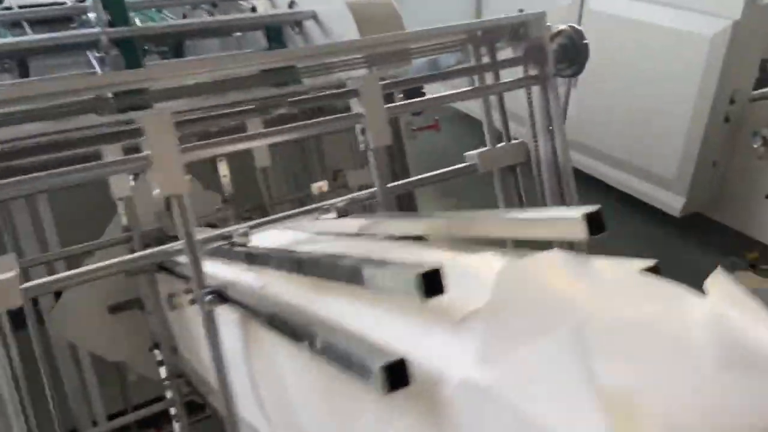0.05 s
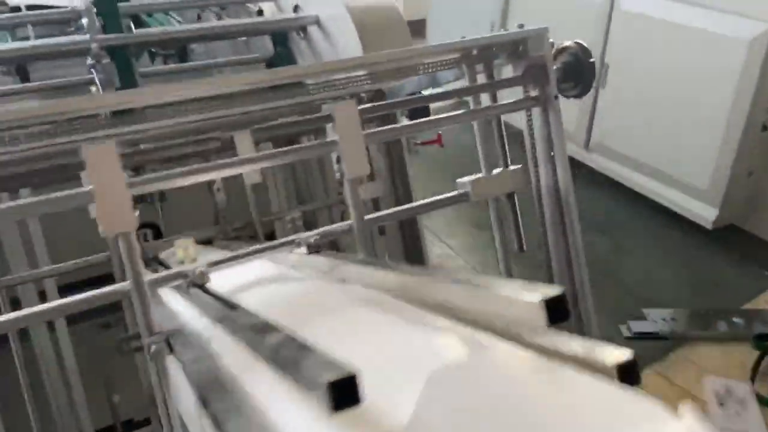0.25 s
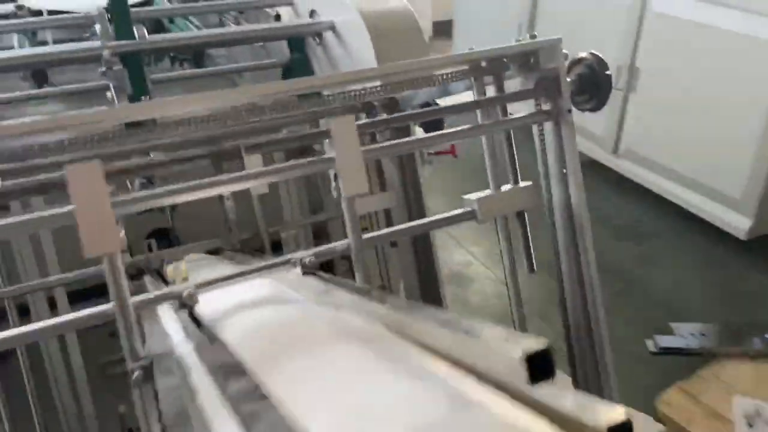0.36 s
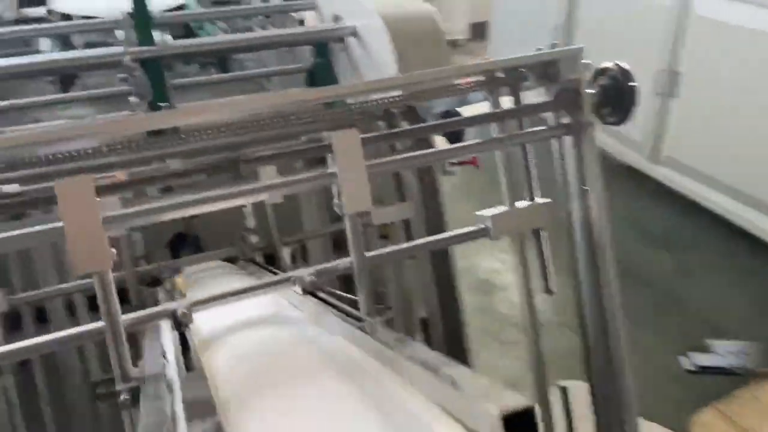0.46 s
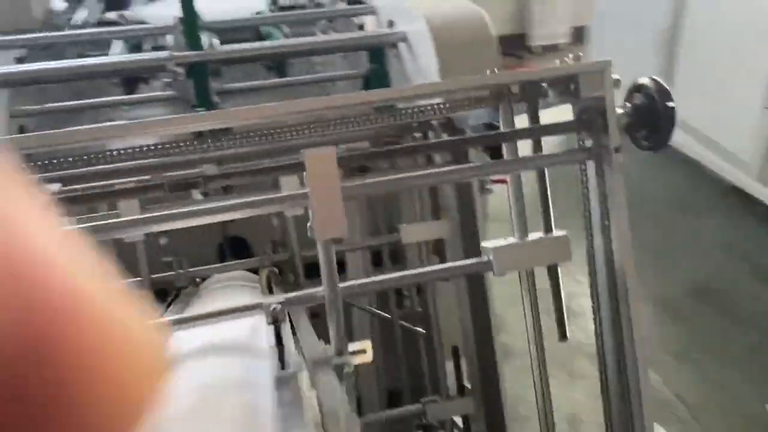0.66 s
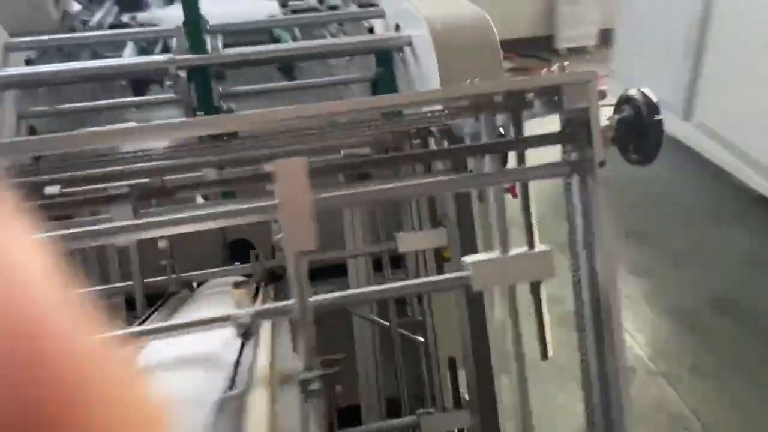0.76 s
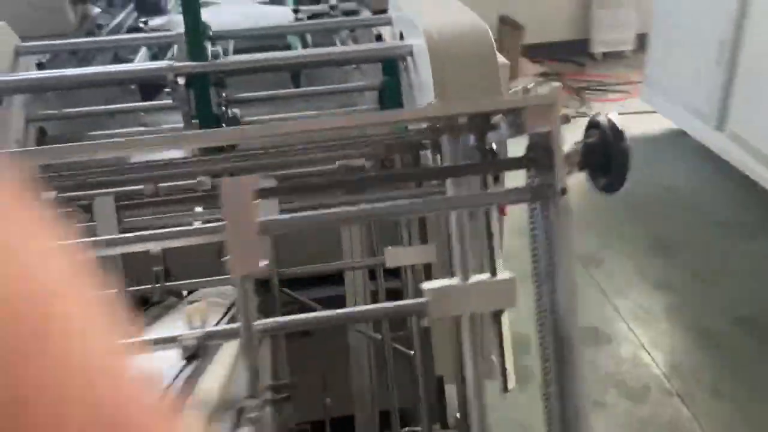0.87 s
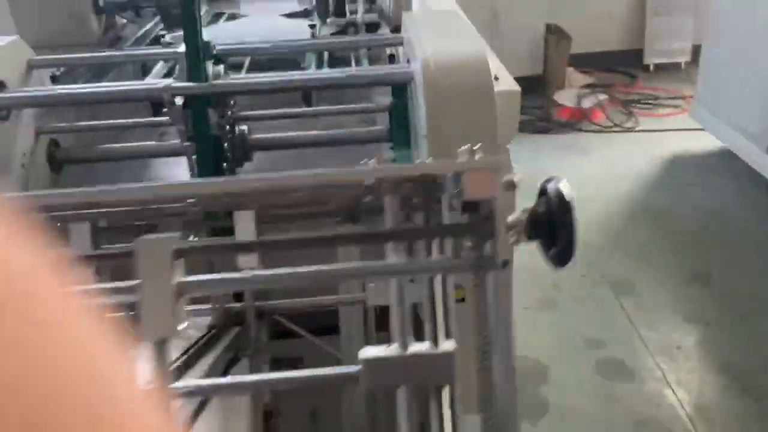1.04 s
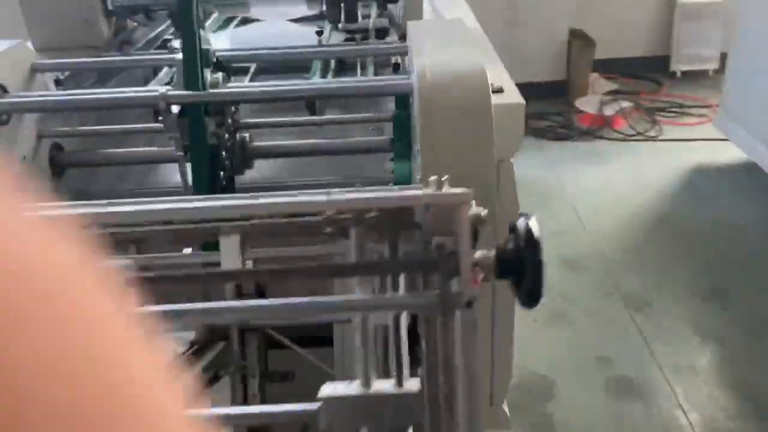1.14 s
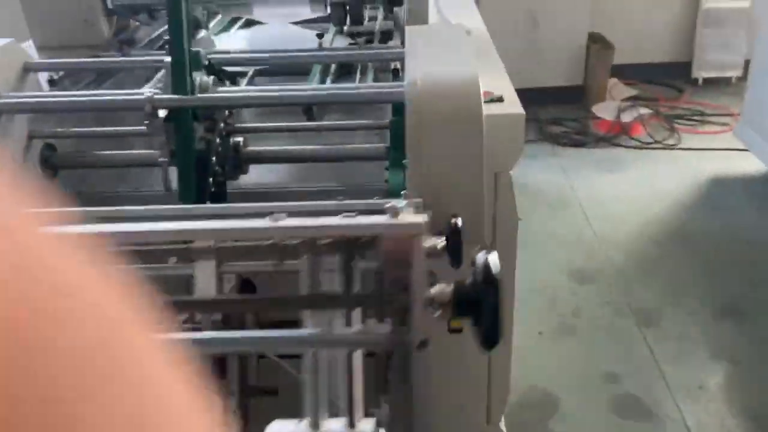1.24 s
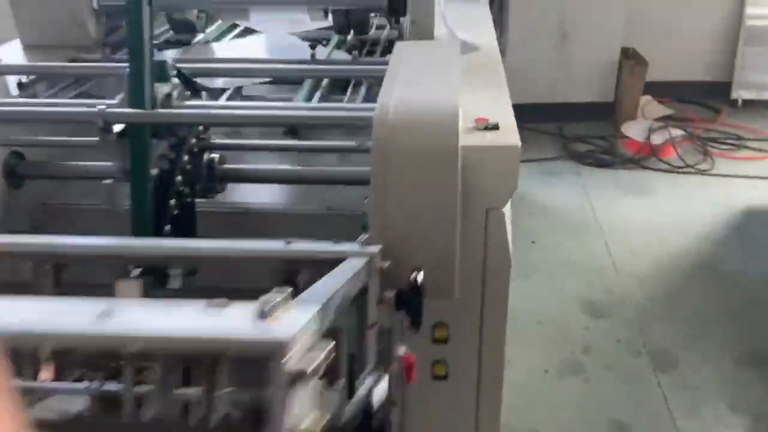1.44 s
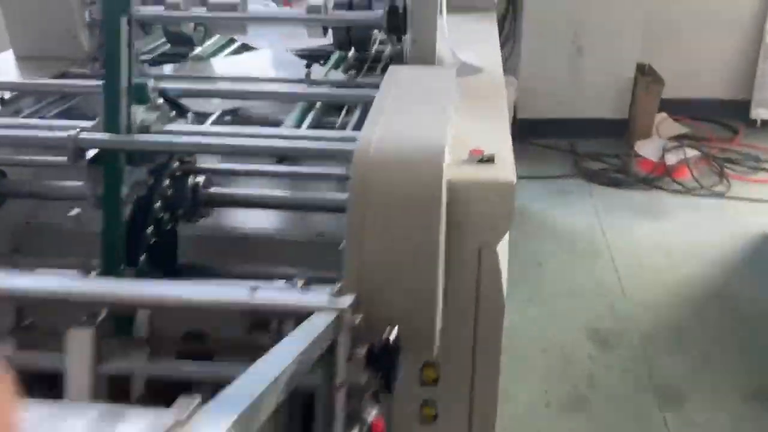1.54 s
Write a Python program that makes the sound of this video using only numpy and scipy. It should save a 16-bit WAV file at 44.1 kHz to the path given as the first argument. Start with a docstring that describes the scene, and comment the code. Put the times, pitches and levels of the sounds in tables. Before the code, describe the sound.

Steel bars clatter briefly, then knock lightly over a humming, whirring workshop machine.

```python
"""A clatter of steel guide bars comes first, then a few lighter knocks: a paper-box machine at work.
The stereo microphone is close beside the bars, in a hard-walled workshop. Each knock clicks, clanks the
loose clamps and sets bars and frame ringing, and the hall answers. Underneath, the mechanism thumps,
the drive hums, whines and rumbles, rollers whirr, small parts tick and an airy hiss comes and goes."""
import sys
import numpy as np
from scipy import signal
from scipy.fft import rfft, irfft
from scipy.io import wavfile
from scipy.ndimage import uniform_filter1d

SR = 44100
rng = np.random.default_rng(int(sys.argv[2]) if len(sys.argv) > 2 else 0)


def dump_mix(stems):
    """Bounce the given channels to the path in sys.argv[1] as a 16-bit WAV at rate SR."""
    frames = np.atleast_2d(stems).T  # one column per channel
    limited = np.clip(frames, -1, 1)  # hard clip at full scale
    pcm = np.round(limited * 32767).astype(np.int16)
    wavfile.write(sys.argv[1], SR, pcm)


N = 70560
TIME = np.arange(N) / SR
SIDES = np.array([[0.5], [-0.5]])  # splits a left-minus-right difference between the channels

# knocks beside the microphone: t/s, relative level/dB of body, of clank and of click, build-up/s
KNOCKS = [(0.076, -20, -16, -48, 0.0048), (0.088, -10.5, -12, -45, 0.0024), (0.097, -5, -10.5, -25, 0.0037),
          (0.1092, -3.5, -0.5, -16, 0.0028), (0.115, -1, -3.5, -19, 0.0041),
          (0.122, -13, -2.5, -22, 0.0041), (0.133, -6.5, -4, -18, 0.0043), (0.1414, -12, 0, -7, 0.006),
          (0.148, -11.5, -1.5, -13, 0.0033), (0.167, -12, -2.5, -23, 0.0029),
          (0.21, -19.5, -15, -40, 0.0027), (0.278, -46, -14, -43, 0.001), (0.2896, -45, -20.5, -14, 0.0018),
          (0.307, -14.5, -11, -30, 0.0048), (0.39, -20, -13, -28, 0.0046), (0.398, -13, -9, -27, 0.0052),
          (0.453, -25, -21, -52, 0.0067), (0.8088, -37, -15.5, -27.5, 0.00084)]
# colours of the bars' dense ring, their loose clamps and steel on steel: f/Hz, relative level/dB
BODY_COLOUR = [(40, -5), (120, -5), (200, -2), (300, -3.5), (400, -6), (490, -3), (760, -2.5), (1350, -0.5),
               (2000, -34), (3000, -20), (5000, -36), (15000, -64)]
CLANK_COLOUR = [(400, -15.5), (1200, 5.5), (1900, 2.5), (3000, -2), (4200, -11), (7000, -13.5),
                (15000, -68)]
CLICK_COLOUR = [(500, -30), (2500, -14), (4500, 3.5), (6500, -5), (10500, 5.5), (15500, -2.5)]
def guide_bars():
    """Each knock clicks steel on steel, clanks the clamps and sets off the bars' dense, short ring."""
    body_t60_s, clank_t60_s, click_t60_s = 0.1, 0.059, 0.018
    clank_left_db, click_lag_s = 3, 0.00028
    body = amp(-14) * noise(BODY_COLOUR)
    clank = amp(-14.5 + SIDES * clank_left_db) * noise(CLANK_COLOUR)
    snap = amp(-9) * noise(CLICK_COLOUR)[0]
    click = np.array([np.roll(snap, int(click_lag_s * SR)), snap])  # reaches the right port first
    out = np.zeros((2, N))
    for start, body_db, clank_db, click_db, build in KNOCKS:
        shift = rng.integers(N)  # a different stretch of noise for every knock
        parts = (body, body_db, body_t60_s), (clank, clank_db, clank_t60_s), (click, click_db, click_t60_s)
        for sound, db, t60 in parts:
            out += amp(db) * np.roll(sound, shift, axis=1) * strike(start, build, t60)
    return out


# notes of the square tubes, heard close: t/s, f/Hz, level/dB
TUBE_NOTES = [(0.1137, 784, -10), (0.136, 673, -11), (0.305, 655.4, -28), (0.395, 567, -29.5)]
def hollow_tubes():
    """The heavier knocks briefly sound the hollow of the tubes."""
    return sum(ring(start, hz, db, build=0.007, t60=0.03) for start, hz, db in TUBE_NOTES)


# modes of the steel frame: f/Hz, relative level/dB, left minus right level/dB, left phase lead/rad
FRAME_MODES = [(236, -2, 0, .2), (288, -1, 0, .2), (329, 0, 0, .3), (398, -5, 0, .4), (598, -6, 1, .6),
               (673, -1, 3, .8), (725, -2, 3, .8), (757, -1, 3, .8), (825, -3, 1, .9), (889, -2, -1, 1.),
               (1057, -6, -2, 1.2), (1126, -5, -3, 1.3), (1224, -4, -3, 1.4), (1343, -2, -3, 1.5),
               (1471, -4, -1, 1.5), (1840, -7, 2, 1.8)]
def frame():
    """The frame's modes store the energy of every knock and let it die away."""
    energy = sum((amp(db) * strike(start, build, t60=0.14)) ** 2 for start, db, _, _, build in KNOCKS)
    modes = 0
    for hz, db, left_db, lead in FRAME_MODES:
        phase = 2 * np.pi * (hz * TIME + rng.random()) + 0.58 * wander(41.1)
        tilt_db = -0.46 * np.log2(hz / 700)
        modes += amp(db + tilt_db + SIDES * left_db) * np.sin(phase + SIDES * lead)
    return amp(-19) * np.sqrt(energy) * modes


# colour of the workshop's echo at the microphone: f/Hz, relative level/dB
HALL_COLOUR = [(80, -18), (330, 1), (700, 0.5), (1500, 3.5), (2500, 2.5), (5000, 1), (15000, 2)]
def hall(sound):
    """The hard walls return a diffuse tail whose treble dies sooner."""
    wash = noise(HALL_COLOUR)
    low = signal.sosfilt(signal.butter(2, 3000, fs=SR, output="sos"), wash)
    treble = wash - low
    tail = low * strike(0, build=0.003, t60=1.68) + treble * strike(0, build=0.003, t60=1)
    return amp(-6) * through(sound.mean(axis=0), unit(tail) / np.sqrt(N))


# dull thumps from inside the machine: t/s, f/Hz, level/dB
THUMPS = [(0.175, 125.1, -25), (0.551, 125, -24), (0.628, 77.4, -25), (0.965, 150.2, -25),
          (0.971, 80.3, -23.5), (1.254, 75.7, -27.5)]
def thumps():
    """Each soft bump of the mechanism rings one low resonance."""
    return sum(ring(start, hz, db, build=0.0073, t60=0.14) for start, hz, db in THUMPS)


# rumble of the drive, heard from the bars: f/Hz, relative level/dB
RUMBLE_COLOUR = [(22, -31), (38, -4), (72, -2), (100, -4.5), (135, 0.5), (220, -3.5), (390, -8),
                 (500, -16.5), (900, -15), (3000, -64)]
# the motor's hum and its faint metallic whine: f/Hz, level/dB midway through the fade
HUM_TONES = [(85, -45), (119, -43), (149, -45), (186, -48), (246, -47), (279, -51), (408, -50), (519, -57),
             (692, -53), (742, -57)]
WHINE_TONES = [(1039, -57), (1384, -59), (1483, -57), (1744, -54), (1846, -59), (2702, -61)]
# narrow whirrs of the bearings: f/Hz, width/Hz, level/dB midway through the fade
BEARING_WHIRRS = [(1980, 37, -68.5), (2225, 14, -54), (2765, 210, -54.5), (4460, 360, -56.5)]
def drive():
    """Motor tones and bearing whirrs ride on the drive's rumble, all slowly fading."""
    fade_db_per_s = 1.7
    rumble = amp(-34.5 + 1.2 * wander(30.4)) * noise(RUMBLE_COLOUR)
    hum = sum(amp(db) * tone(hz, waver_db=3) for hz, db in HUM_TONES)
    whine = sum(amp(db) * tone(hz, waver_db=1.5) for hz, db in WHINE_TONES)
    bearings = 0
    for hz, width, db in BEARING_WHIRRS:
        bearings += amp(db) * np.array([narrow_noise(hz, width), narrow_noise(hz, width)])
    return (rumble + hum + whine + bearings) * amp(-fade_db_per_s * (TIME - TIME.mean()))


# drone of a panel on the machine: t/s, level/dB
PANEL_LEVEL = [(0, -38.5), (.29, -45), (.43, -31.5), (.58, -41.5), (.95, -42), (1.15, -53), (1.6, -48.5)]
def panel():
    """A panel drones on one rough note, louder just after the clatter."""
    hz, buzz_share = 335, 0.3
    note = np.sqrt(1 - buzz_share) * tone(hz, waver_db=2)
    buzz = np.sqrt(buzz_share) * narrow_noise(hz, width_hz=55)
    return amp(over_time(PANEL_LEVEL)) * (note + buzz)


# rollers and belts, heard from the bars: t/s, level/dB
ROLLER_LEVEL = [(0, -42.5), (.4, -35), (.7, -39), (1.05, -36.5), (1.35, -40.5), (1.6, -40)]
# their colour: f/Hz, relative level/dB
ROLLER_COLOUR = [(250, -9.5), (550, 5.5), (750, 2.5), (1300, 0.5), (1800, 0.5), (2600, -4.5), (3200, -10),
                 (4500, -14.5), (5400, -18), (7500, -13.5), (15000, -78)]
def rollers():
    """Running rollers and belts make a broad whirr that flutters slightly."""
    return amp(over_time(ROLLER_LEVEL) + 0.5 * wander(38.7)) * noise(ROLLER_COLOUR)


def rattle():
    """Small loose parts tick at random, each with a very short ring in the colour of the bars."""
    ticks_per_s = 99
    ticks = (rng.random(N) < ticks_per_s / SR) * rng.uniform(-0.49, 1, N)
    tick_ring = noise(BODY_COLOUR) * strike(0, build=0.00023, t60=0.015)
    return amp(-52.5) * unit(through(ticks, tick_ring))


# airy hiss at the microphone: t/s, level/dB
HISS_LEVEL = [(0, -42.5), (.25, -50), (.44, -51), (.58, -73), (.66, -56), (.76, -47), (1.02, -42.5),
              (1.17, -47.5), (1.29, -55), (1.6, -58.5)]
# its colour: f/Hz, relative level/dB
HISS_COLOUR = [(1500, 6), (4000, 14), (5800, 2), (11000, 12), (15500, 11)]
def hiss():
    """A high, airy hiss swells, sinks and flickers."""
    return amp(over_time(HISS_LEVEL) + 0.7 * wander(60.3)) * noise(HISS_COLOUR)


# likeness of the sound at the left and right microphone ports: f/Hz, correlation
PORT_LIKENESS = [(60, 0.98), (200, 0.96), (380, 0.73), (700, 0.18), (1200, 0.091), (2400, 0.16), (4400, 1),
                 (8000, 0.037), (11000, 0.37), (15000, -0.32)]
def noise(colour):
    """Coloured noise with an rms of one, as two nearby microphone ports hear it."""
    likeness = np.clip(over_hz(PORT_LIKENESS), -1, 1)
    spectra = rfft(rng.standard_normal((2, N))) * amp(over_hz(colour))
    mid, side = spectra * np.sqrt([1 + likeness, 1 - likeness])
    return unit(irfft(np.array([mid + side, mid - side]), N))


def narrow_noise(hz, width_hz):
    """Noise in one resonance."""
    return unit(signal.lfilter(*signal.iirpeak(hz, hz / width_hz, fs=SR), rng.standard_normal(N)))


def tone(hz, waver_db):
    """A sine that wavers in pitch and level."""
    drift_hz = 2.485 * wander(10.03)
    phase = 2 * np.pi * (np.cumsum(hz + drift_hz) / SR + rng.random())
    return unit(np.sin(phase) * amp(waver_db * wander(16.24)))


def ring(start, hz, db, build, t60):
    """One resonance that swells under a blow and dies away."""
    return amp(db) * strike(start, build, t60) * np.sin(2 * np.pi * (hz * TIME + rng.random()))


def strike(start, build, t60):
    """Envelope that rises for build seconds, then falls 60 dB every t60 seconds."""
    age = np.maximum(TIME - start, 0)
    rise = np.minimum(age / max(build, 1 / SR), 1)
    return rise * np.exp(-np.log(1000) * np.maximum(age - build, 0) / t60)


def wander(steps_per_s):
    """Smooth random motion with an rms of one."""
    hold = int(SR / steps_per_s)
    steps = np.repeat(rng.standard_normal(N // hold + 1), hold)
    return unit(uniform_filter1d(uniform_filter1d(steps, hold), hold)[:N])


def through(sound, response):
    """Pass a sound through a response in each channel."""
    return signal.fftconvolve(np.atleast_2d(sound), response, axes=-1)[:, :N]


def over_time(points):
    """A table joined by straight lines in time."""
    return np.interp(TIME, *np.array(points).T)


def over_hz(points):
    """A table joined by straight lines on a log-frequency axis."""
    hz, value = np.array(points).T
    return np.interp(np.log(np.arange(N // 2 + 1) * SR / N + 1), np.log(hz), value)


def amp(db):
    """Decibels to gain."""
    return 10 ** (np.asarray(db) / 20)


def unit(x):
    """Scale to an rms of one."""
    return x / np.sqrt(np.mean(x ** 2))


def scene():
    """The close knocks and their echo over the running machine, its drive and panel slightly left."""
    bars = guide_bars()
    blows = bars + hall(bars) + hollow_tubes() + frame() + thumps()
    drone = (drive() + panel()) * amp(SIDES * 1.54)
    return blows + drone + rollers() + rattle() + hiss()


def record(dry):
    """The recorder drops the deepest bass, clips peaks at full scale and cuts the top."""
    low_cut = signal.butter(4, 34, "high", fs=SR, output="sos")
    top_cut = signal.ellip(10, 0.2, 80, 15800, fs=SR, output="sos")
    clipped = np.clip(signal.sosfilt(low_cut, dry), -1, 1)
    return signal.sosfilt(top_cut, clipped)


dry = scene()
out = record(dry)
dump_mix(out)
```